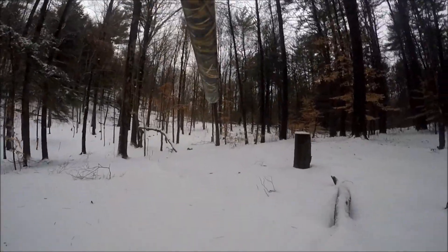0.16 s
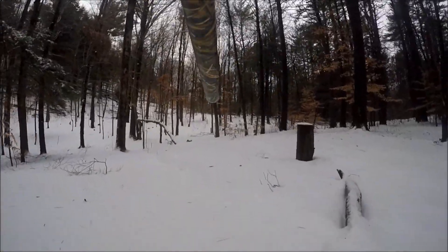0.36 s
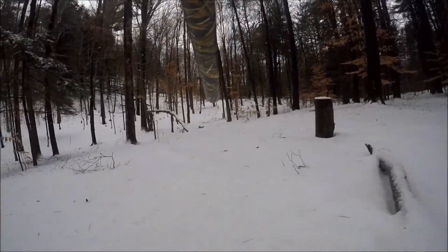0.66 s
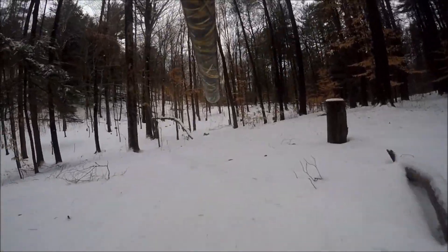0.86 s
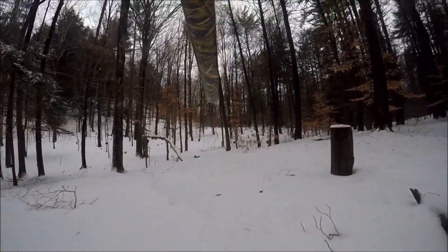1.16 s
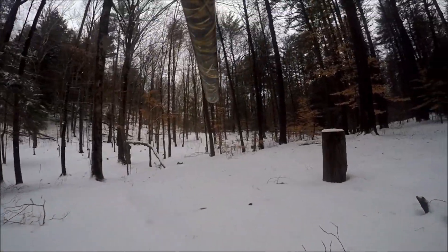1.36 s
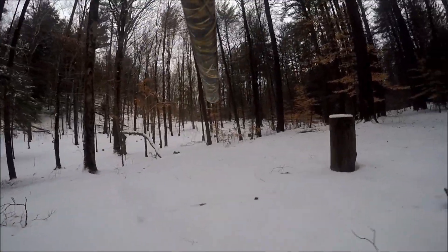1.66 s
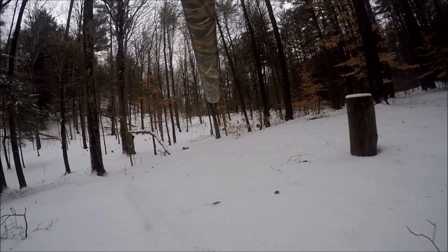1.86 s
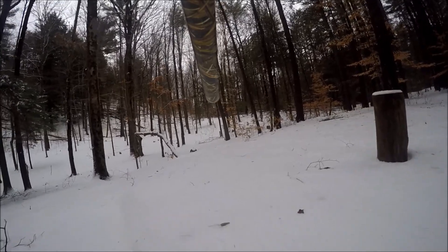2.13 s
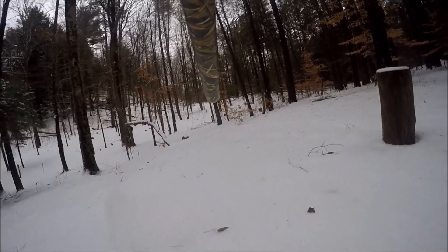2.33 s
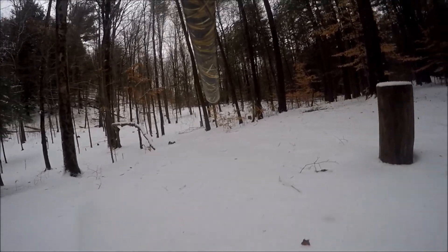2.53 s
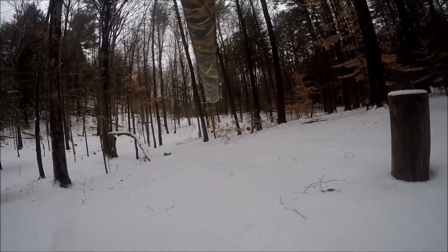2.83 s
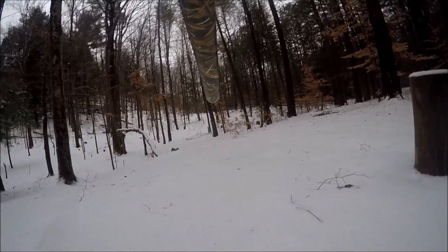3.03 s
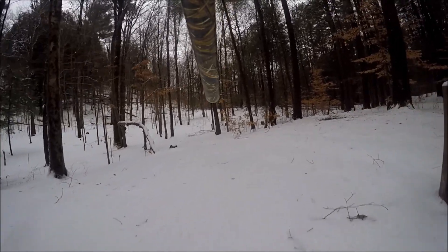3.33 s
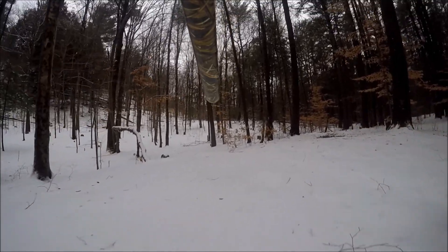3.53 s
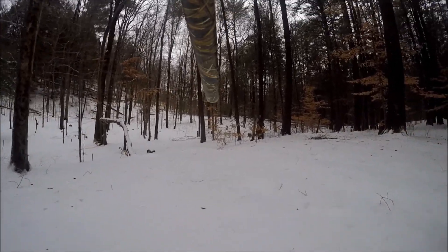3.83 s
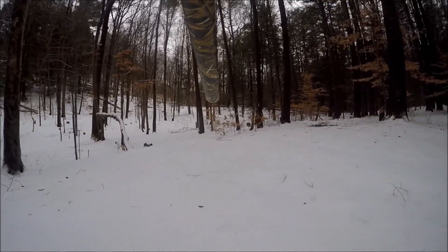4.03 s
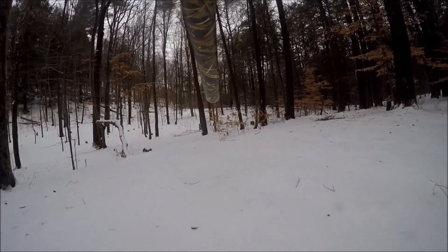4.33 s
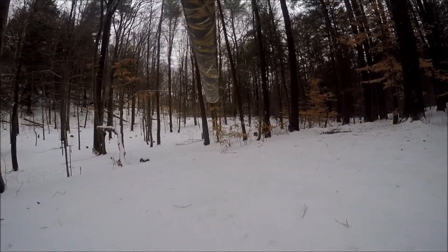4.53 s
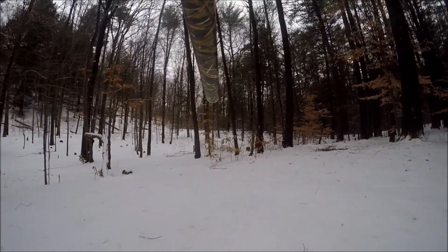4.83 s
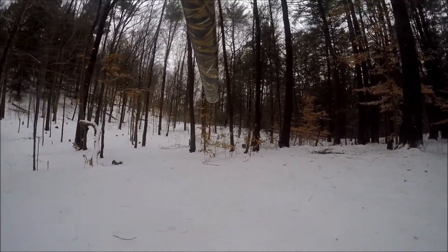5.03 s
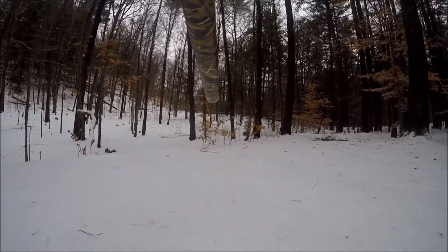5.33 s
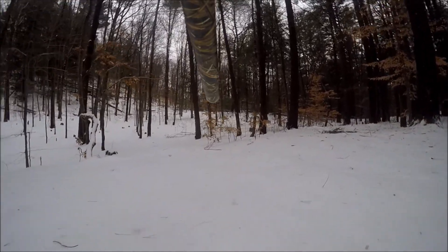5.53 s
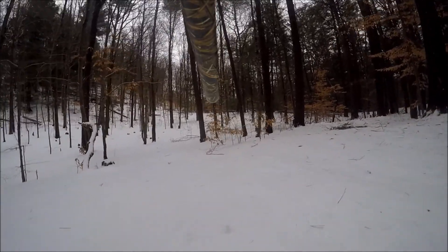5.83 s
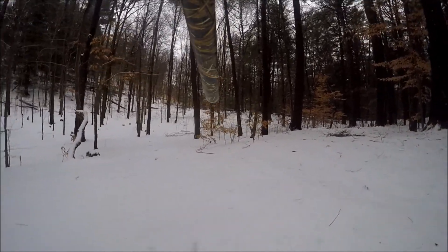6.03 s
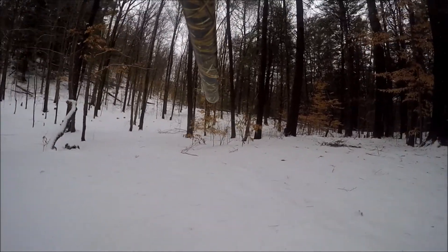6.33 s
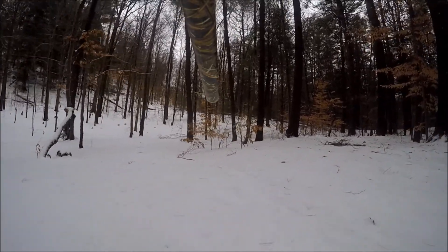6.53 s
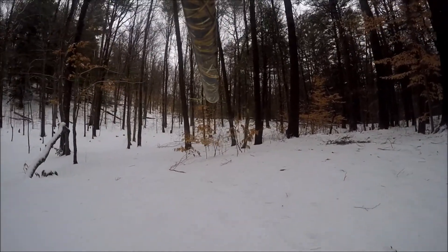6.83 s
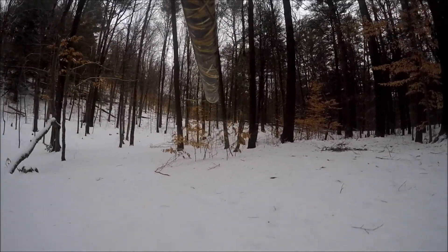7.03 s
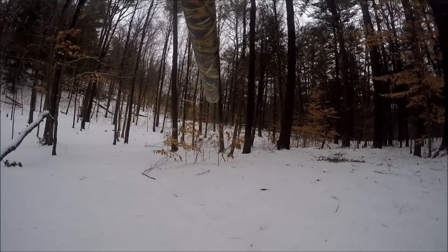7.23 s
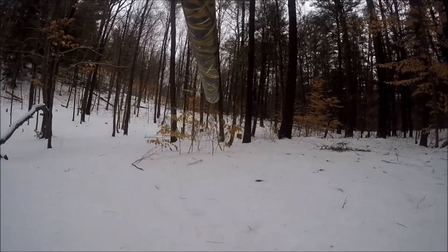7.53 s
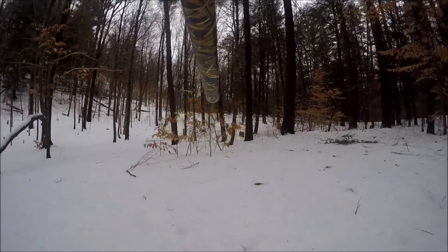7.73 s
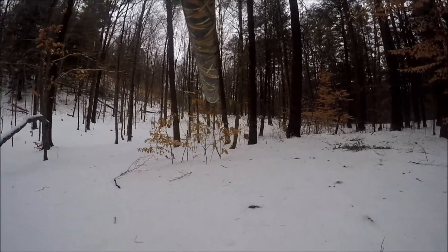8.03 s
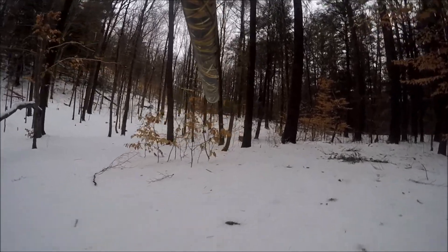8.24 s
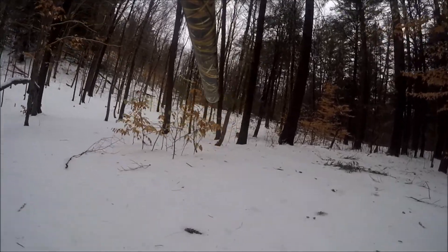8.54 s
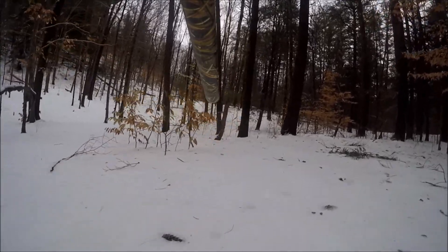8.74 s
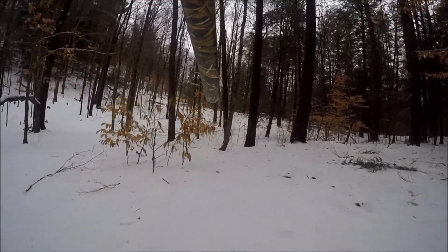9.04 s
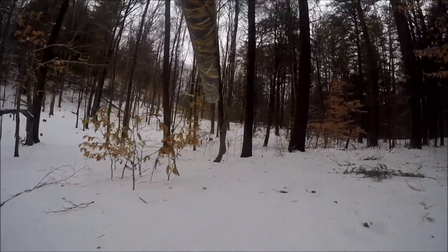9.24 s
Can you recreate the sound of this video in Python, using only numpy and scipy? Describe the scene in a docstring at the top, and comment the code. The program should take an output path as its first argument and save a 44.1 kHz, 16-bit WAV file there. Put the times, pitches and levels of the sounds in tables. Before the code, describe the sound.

Someone walks over crisp, squeaky snow, each step a grainy crunch, while carried gear thuds and hums low close to the microphone.

```python
"""Boots crunch through crusty snow in still winter woods, heard by a small camera in a housing on carried gear.
Breaking crust is a hail of short noisy grains, one band for each grain size, coloured by the housing;
slabs of crust snap as sudden noise spurts. Knocks tap the shell and set the mount ringing on two close
low modes that beat; walking hums in the mount, rumbles in the microphone and rattles loose gear.
Faint filtered noise makes the still air and the microphone's own hiss."""
import sys
import numpy as np
from scipy import signal
from scipy.fft import rfft, irfft
from scipy.io import wavfile

SR = 44100
rng = np.random.default_rng(int(sys.argv[2]) if len(sys.argv) > 2 else 0)


def to_linear_factor(level_db):
    """Convert decibel levels (scalar or array-like) to linear amplitude factors."""
    exponent = np.asarray(level_db, float) / 20
    return 10 ** exponent


def unload_audio(sound):
    """Save the sound as a 16-bit wav file, at the path given as the first command line argument."""
    columns = np.transpose(np.atleast_2d(sound))
    # keep every value between -1 and 1, then stretch to whole-number steps
    steps = np.round(np.clip(columns, -1, 1) * 32767)
    wavfile.write(sys.argv[1], SR, steps.astype(np.int16))


N = 413658  # samples

# grain sizes from lumps to crystals: breaks_per_s, fade_t60_s, steady_share (against grains of rms 1)
GRAIN_SIZES = [(292.5, 0.027, 0.28), (301, 0.016, 2.75), (526, 0.007, 1.44), (498, 0.0049, 0.99),
               (700, 0.0078, 2.5), (1390, 0.0022, 0.08), (1750, 0.0042, 0.32)]
# borders between the bands that the grain sizes fill: edge_hz
GRAIN_EDGES = [950, 2000, 2600, 3200, 5000, 8000]
# spectrum of breaking snow: frequency_hz, density_db
SNOW_SPECTRUM = [(100, 1.5), (200, -2), (500, -6.5), (1000, -0.5), (2000, -1), (4000, -4.5), (7000, -2),
                 (10000, -17.5), (15000, -21.5)]
# a spectrum that changes nothing: frequency_hz, gain_db
FLAT_SPECTRUM = [(1000, 0)]
# peaks and dips of the housing in front of the microphone: centre_hz, width_hz, gain_db
HOUSING_PEAKS = [(1305, 130, 6), (1620, 77, -10.5), (1830, 190, 4), (2630, 516, 16), (3844, 236, -9.5),
                 (4560, 1930, 4), (10460, 1200, 5.5), (11500, 670, -5.5), (13500, 730, 5),
                 (14000, 300, -14)]
# peaks and dips on each boot's own side of the housing, one list a boot: centre_hz, width_hz, gain_db
BOOT_PEAKS = [
    [(4630, 1700, 3), (6060, 390, -5), (6600, 260, 2.5), (7600, 780, -4), (8570, 550, 2)],
    [(3800, 390, 4), (7300, 530, 3), (8040, 1660, -7)],
]
FIRM_DB = -34  # reference level of firm pressure
LOW_DB, LOW_PER_DB = -9.5, 0.2525  # low crunch at the firm level and the start; its gain in dB per dB of easing
THINNING_DB_PER_S = -0.2328  # the lower crunch weakens as the snow gets shallower along the way


def crush():
    """Granular fracture: each grain size breaks at random in its own band; shared slips modulate them all."""
    power, fine_power = pressure()
    level_db = 10 * np.log10(power)
    thinning_db = THINNING_DB_PER_S * np.arange(N) / SR
    low_db = LOW_DB + thinning_db + LOW_PER_DB * (FIRM_DB - level_db)

    # under full weight the snow gives evenly; light scuffs come in fits
    fits = np.clip(0.5 + 0.013 * (FIRM_DB - level_db), 0.3, 2.5)
    slips = (1.21 + grains(rate=47, spread_db=2.0, t60=0.075)) ** fits / 2.08 ** fits

    rest = colour(rng.standard_normal(N), SNOW_SPECTRUM)
    bands = []
    for hz in GRAIN_EDGES:
        bands.append(band(rest, hz, "low", order=3))
        rest = band(rest, hz, "high", order=3)
    bands.append(rest)

    # the mix of sizes changes as the sole rolls over the snow
    parts = []
    for noise, (rate, t60, steady) in zip(bands, GRAIN_SIZES):
        mix = drift(rate=14.0, depth_db=2.0)
        breaking = unit(steady + grains(rate, 2.26, t60))
        parts.append(noise * slips * mix * breaking)

    # firm pressure brings out the squeaky middle sizes
    squeak = to_linear_factor(np.clip(0.56 * (level_db - FIRM_DB), -4, 5))
    parts[2:4] = [part * squeak for part in parts[2:4]]
    parts[1] = parts[1] * to_linear_factor(thinning_db)

    side = boot(np.arange(N) / SR)

    def through_housing(group):
        """Resonant transmission: the path through the housing changes with the boot that is down."""
        sides = [colour(sum(group), FLAT_SPECTRUM, HOUSING_PEAKS + peaks) for peaks in BOOT_PEAKS]
        return unit(np.choose(side, sides))

    low = through_housing(parts[:1])
    middle = through_housing(parts[1:5])
    fine = through_housing(parts[5:])
    return to_linear_factor(level_db) * (to_linear_factor(low_db) * low + middle) + np.sqrt(fine_power) * fine


# pushes of heel, sole or toe into the snow: start_s, length_s, level_db, change_by_end_db,
# fine_hiss_db (relative to the push)
PUSHES = [(0.0, 0.087, -31, -15, -10.5), (0.09, 0.096, -34, 4.5, -9), (0.189, 0.047, -32, -8.5, -11),
          (0.25, 0.04, -44, 6, -6), (0.664, 0.058, -38, 9, -8.5), (0.73, 0.11, -25.5, -5.5, -11),
          (0.855, 0.022, -24, -14.5, -4.5), (1.22, 0.064, -42, 1.5, -10.5), (1.29, 0.1, -31.5, -4, -9),
          (1.381, 0.058, -39, -4.5, -11), (1.756, 0.067, -35.5, 4, -15), (1.831, 0.11, -30, -2.5, -9),
          (1.912, 0.11, -40, -2, -2.5), (2.239, 0.085, -34.5, 3, -12), (2.333, 0.12, -35.5, 0.5, -9),
          (2.501, 0.032, -38.5, 0, -2.5), (2.899, 0.055, -32.5, 0.5, -7), (2.962, 0.15, -27.5, -4, -8.5),
          (3.113, 0.029, -51, 6.5, -7), (3.18, 0.021, -35.5, -7, -18), (3.424, 0.092, -50, 8.5, -6),
          (3.533, 0.07, -44, 8.5, -4.5), (3.594, 0.11, -29.5, -6, -10), (3.714, 0.042, -50, 8, -9.5),
          (4.097, 0.088, -33, -2, -10), (4.186, 0.19, -30, -9.5, -11), (4.737, 0.058, -38, 11.5, -16),
          (4.783, 0.12, -30, -5.5, -10), (5.318, 0.053, -34.5, 6, -12.5), (5.38, 0.11, -26.5, -6.5, -10.5),
          (5.492, 0.078, -31.5, -5, -10), (5.81, 0.18, -42, -6, -7.5), (5.909, 0.034, -29.5, -3.5, -15),
          (5.936, 0.138, -25, -11, -13), (6.365, 0.13, -27.5, -10.5, -13.5),
          (6.478, 0.15, -26.5, -9.5, -14.5), (6.629, 0.014, -30, -3.5, -8), (6.992, 0.13, -34.5, 1.5, -9),
          (7.126, 0.05, -45.5, 1, -12), (7.464, 0.19, -32.5, -2, -12.5), (7.603, 0.1, -28.5, -19.5, -13),
          (7.691, 0.037, -35.5, -7.5, -10), (7.735, 0.042, -41.5, -3.5, -6.5),
          (8.082, 0.16, -33.5, -1.5, -10), (8.262, 0.014, -39, 3, -1.5), (8.624, 0.061, -31.5, 1, -10),
          (8.685, 0.15, -29.5, -6, -8.5), (9.112, 0.024, -37.5, -2, -9), (9.151, 0.048, -40.5, 5, -9),
          (9.221, 0.036, -45.5, 3, -11), (9.251, 0.13, -30.5, -2, -9.5)]
# crumbs of crust and small scuffs between the pushes: centre_s, peak_db, fine_hiss_db (relative to the crumb)
CRUST_CRUMBS = [(0.365, -45.5, -9), (0.628, -44, -3.5), (0.897, -32.5, -11), (0.92, -45, -18),
                (0.965, -44, -19), (1.121, -40, -15), (1.175, -42.5, -6), (1.2, -42.5, -4),
                (1.466, -38, -8), (1.538, -40, -5.5), (1.704, -46, -21), (2.052, -41, -4.5),
                (2.576, -44.5, -8), (4.44, -45, -2.5), (4.672, -41, -9), (4.716, -43.5, -8.5),
                (5.149, -48, -15), (5.284, -52, -16), (5.792, -36.5, -7), (6.109, -36, -2.5),
                (6.675, -42.5, -10), (6.713, -46, -10), (6.956, -41, -3.5), (7.206, -42, -3),
                (7.819, -39, -9.5), (7.96, -50, -13), (7.998, -44, -10), (8.049, -48, -10),
                (8.353, -48, -6), (8.848, -39.5, -3.5), (8.869, -39.5, -11), (8.885, -39, -8)]
BITE_S, RELEASE_S, CRUMB_S = 0.01, 0.041, 0.0099  # rise of a push, t60 after it, half length of a crumb
SETTLE_DB, SETTLE_S = -17.5, 0.63  # loose snow trickles after each push: level relative to it, t60
RUSTLE_DB, RUSTLE_FINE_DB = -62.5, -8.5  # legs and clothing: level, and fine hiss relative to it


def pressure():
    """Addition of powers: pushes bite fast, hold on a slope and let go; crumbs are brief raised bumps."""
    t = np.arange(N) / SR
    power = (to_linear_factor(RUSTLE_DB) * drift(rate=61.0, depth_db=2.0)) ** 2
    fine = power * to_linear_factor(2 * RUSTLE_FINE_DB)  # twice the dB, because these are powers
    pushes = np.zeros(N)
    for s, length, db, change_db, fine_db in PUSHES:
        near = slice(int(s * SR), int((s + length + RELEASE_S) * SR))
        age = t[near] - s
        slope_db = change_db * np.minimum(age / length, 1)
        release_db = -60 * np.maximum(age - length, 0) / RELEASE_S
        push = to_linear_factor(2 * (db + slope_db + release_db)) * np.minimum(age / BITE_S, 1) ** 2
        pushes[near] += push
        fine[near] += push * to_linear_factor(2 * fine_db)
    for s, db, fine_db in CRUST_CRUMBS:
        near = slice(int((s - CRUMB_S) * SR), int((s + CRUMB_S) * SR))
        bump = to_linear_factor(2 * db) * np.cos(np.pi / 2 * (t[near] - s) / CRUMB_S) ** 2
        power[near] += bump
        fine[near] += bump * to_linear_factor(2 * fine_db)
    # a thousandfold fall of power is only 30 dB, so fading over half of SETTLE_S lets the power fall by 60 dB
    # in SETTLE_S
    tail = fade(pushes, SETTLE_S / 2) * np.log(1000) / (SETTLE_S / 2 * SR)
    trickle = to_linear_factor(2 * SETTLE_DB) * tail
    return power + pushes + trickle, fine + trickle * to_linear_factor(2 * RUSTLE_FINE_DB)


FIRST_SWAP_S, STEP_S = 0.5, 0.567  # the boots take turns


def boot(s):
    """Periodic alternation of gait: which boot is down at time s, 0 or 1."""
    return (np.floor((s - FIRST_SWAP_S) / STEP_S).astype(int) + 1) % 2


# slabs of crust snapping: start_s, bright_peak_db, fade_t60_s
SLAB_SNAPS = [(0.516, -33.5, 0.053), (0.673, -19.5, 0.016), (0.742, -13.5, 0.04), (0.757, -25, 0.03),
              (0.785, -22, 0.022), (0.834, -25, .015), (0.854, -21, 0.012), (0.858, -16, 0.037),
              (1.1326, -19.5, 0.027), (1.316, -28, 0.035), (1.767, -24.5, 0.014), (1.8392, -22, 0.018),
              (1.874, -20, 0.023), (1.897, -24, 0.025), (2.272, -19.5, 0.027), (2.293, -21, 0.022),
              (2.415, -24, 0.033), (2.653, -33.5, 0.014), (2.9029, -14.5, 0.015), (2.93, -21.5, 0.028),
              (2.971, -23, 0.058), (2.983, -19, .02), (3.002, -26, 0.025), (3.041, -18.5, 0.027),
              (4.132, -19, 0.033), (4.172, -23.5, 0.022), (4.199, -15.5, 0.064), (4.218, -15, 0.027),
              (4.31, -26, 0.024), (4.3827, -26, 0.015), (4.78, -20, 0.027), (4.804, -18, 0.032),
              (4.9722, -28.5, 0.057), (5.05, -22.5, 0.017), (5.363, -22, .02), (5.376, -22, 0.025),
              (5.39, -18.5, 0.04), (5.438, -23, .015), (5.456, -26, .02), (5.505, -23, 0.019),
              (5.825, -22, 0.047), (5.916, -23.5, 0.064), (5.941, -15, 0.025), (5.971, -21, .02),
              (6.3692, -18, 0.02), (6.4808, -20, 0.051), (6.493, -16.5, 0.015), (6.515, -22, .02),
              (6.559, -16.5, 0.024), (6.638, -21, 0.027), (6.915, -28.5, 0.05), (6.999, -22, 0.022),
              (7.468, -21.5, 0.14), (7.588, -21, 0.022), (7.62, -20, 0.032), (7.7257, -21.5, 0.024),
              (8.114, -20.5, 0.28), (8.156, -19, 0.027), (8.636, -23, 0.078), (8.694, -18, 0.08),
              (8.727, -21, 0.047), (8.817, -23, .03), (9.268, -25, 0.016), (9.276, -19, 0.035),
              (9.291, -20.5, 0.042), (9.322, -20, 0.02)]
DULL_DB = -11  # peak of the lower part of a snap, relative to the bright part


def snaps(size=4096):
    """Brittle fracture: each slab cracks with a sudden spurt of noise, bright over a duller body."""
    out, t = np.zeros(N + size), np.arange(size) / SR
    for s, db, t60 in SLAB_SNAPS:
        decay = np.exp(-np.log(1000) * t / t60)
        rise = np.minimum(t / 0.00076, 1)
        spurt = rng.standard_normal(size) * decay * rise
        spurt = colour(spurt, SNOW_SPECTRUM, HOUSING_PEAKS + BOOT_PEAKS[boot(s)])
        spurt = band(spurt, 5100.0, "low")
        dull = band(spurt, 2430.0, "low")
        bright = spurt - dull
        snap = bright / np.abs(bright).max() + to_linear_factor(DULL_DB) * dull / np.abs(dull).max()
        i = int(s * SR)
        out[i:i + size] += to_linear_factor(db) * snap
    return out[:N]


# knocks on the mount: start_s, ring_db, tap_peak_db, bounce_fade_s (time constant), favoured_pitch_hz
MOUNT_KNOCKS = [(0, -12.5, -31.5, 0.0029, 1020), (0.308, -48, -36, 0.017, 447),
                (0.441, -21, -30, 0.019, 720), (0.61, -28, -28.5, 0.011, 454),
                (1.135, -19, -20, 0.0066, 1240), (1.415, -40, -63, .004, 1000),
                (1.638, -66, -48, .005, 800), (1.66, -62, -50, 0.003, 800), (1.681, -55, -38.5, 0.006, 700),
                (1.9, -31.5, -70, .004, 1000), (2.214, -36, -43, .005, 795),
                (2.271, -17.5, -24, 0.018, 533), (2.606, -37, -38.5, 0.0089, 905),
                (2.651, -25, -33.5, 0.047, 796), (2.705, -21, -25.5, 0.0087, 487),
                (3.008, -31, -60, .004, 1000), (3.14, -37, -43, .004, 800), (3.186, -76, -42, 0.0091, 700),
                (3.449, -21, -38, 0.0054, 610), (4.01, -46, -38, 0.005, 895),
                (4.967, -42, -29, 0.0074, 1400), (5.049, -16, -27.5, 0.0076, 970),
                (5.325, -48, -23, 0.017, 1330), (6.914, -75, -30, 0.0059, 1300),
                (6.953, -71, -34.5, 0.0067, 900), (7.725, -17, -20.5, 0.0082, 1310),
                (7.86, -60, -46, .008, 800), (8.274, -41, -36, 0.0076, 1230)]
# modes of the housing shell before each knock varies them: pitch_hz, level_db (relative), t60_s
SHELL_MODES = [(337, 1, 0.02), (470, 2, 0.028), (642, -1, 0.025), (846, -1, 0.04), (1310, 6, 0.03),
               (1970, -2, .03), (2540, -2, 0.014)]
SPOT_DB = 1.5  # spread of a mode's level from knock to knock
OFF_SPOT_DB = 6.5  # loss per octave away from the favoured pitch


def taps(size=8192):
    """Modal excitation: the spot struck sets the mix of shell modes; one blow and a scatter of quick bounces."""
    out = np.zeros(N + SR + size)
    age = np.arange(size) / SR
    for s, _, tap_db, bounce_s, spot_hz in MOUNT_KNOCKS:
        modes = []
        for hz, db, t60 in SHELL_MODES:
            detune, lift = rng.standard_normal(2)
            loss_db = OFF_SPOT_DB * abs(np.log2(hz / spot_hz))
            modes.append((hz * (1 + 0.022 * detune), db + SPOT_DB * lift - loss_db, t60))
        chance = rng.standard_normal(size)
        rare = np.abs(chance) > 2.5
        blows = 0.16 * chance * np.exp(-age / bounce_s) * rare
        blows[0] = 1
        softened = ring(modes)[:size] * np.minimum(age / 0.0013, 1)
        tap = signal.fftconvolve(softened, blows)
        i = int(s * SR)
        out[i:i + len(tap)] += to_linear_factor(tap_db) * tap / np.abs(tap).max()
    return out[:N]


# low modes of the mount: pitch_hz, level_db (relative), t60_s
# the close pair start in opposite senses, so the ring swells, then beats
MOUNT_MODES = [(97.54, 10.5, 0.47), (107.45, 9, 0.64), (203.5, -12.5, 0.51)]
# how hard walking shakes the gear: time_s, hum_db, rumble_db, shell_rattle_db
WALKING_SWAY = [(0.0, -46.5, -43, -61), (1.2, -38.5, -44.5, -58.5), (2.7, -49, -46, -71),
                (3.6, -43.5, -47, -67.5), (5.5, -43.5, -44, -66), (7.0, -48.5, -48, -84),
                (9.38, -46.5, -44.5, -64.5)]
RING_LAG_S = 0.0041  # the mount answers a moment after the shell
WAVER_DB = 1.5  # the grip on the gear shifts, so the ring wavers


def mount():
    """Beating of coupled modes: knocks ring the mount, and random shaking keeps its low modes humming."""
    response = ring(MOUNT_MODES)
    blows = np.zeros(N)
    for s, ring_db, *_ in MOUNT_KNOCKS:
        blows[int((s + RING_LAG_S) * SR)] = to_linear_factor(ring_db)
    shake_db, rumble_db, _ = curve(WALKING_SWAY)
    shaken = signal.fftconvolve(rng.standard_normal(N), response)[:N]
    hum = to_linear_factor(shake_db) * unit(band(shaken, 106.0, "low"))
    deep = band(rng.standard_normal(N), [14.0, 34.0], "band", order=1)
    deep = unit(band(deep, 43.0, "low"))
    rumble = to_linear_factor(rumble_db) * drift(rate=6.3, depth_db=3.5) * deep
    rings = drift(rate=16.0, depth_db=WAVER_DB) * signal.fftconvolve(blows, response)[:N]
    return rings + hum + rumble


def rattle():
    """Random impact excitation: straps and gear tick against the shell in loose fits as the walker sways."""
    fits = grains(rate=60, spread_db=1.5, t60=0.0061) * drift(rate=8.0, depth_db=4.0)
    ticks = rng.standard_normal(N) * fits
    shell = signal.fftconvolve(ticks, ring(SHELL_MODES))[:N]
    _, _, rattle_db = curve(WALKING_SWAY)
    return to_linear_factor(rattle_db) * unit(band(shell, 1200.0, "low"))


# spectrum of the still woods: frequency_hz, density_db
WOODS_SPECTRUM = [(100, 6), (250, -20), (600, -8.5), (1500, 0.5), (3000, -11.5), (6000, -9.5), (10000, -13),
                  (15000, -16.5)]
WOODS_DB = -64.5  # rms level of the air


def woods():
    """Stationary noise: still air heard through the housing, and the microphone's own hiss, which is not."""
    air = unit(colour(rng.standard_normal(N), WOODS_SPECTRUM, HOUSING_PEAKS))
    hiss = unit(colour(rng.standard_normal(N), WOODS_SPECTRUM))
    return to_linear_factor(WOODS_DB) * (air + to_linear_factor(-1.5) * hiss)


def grains(rate, spread_db, t60):
    """Poisson process: random breaks, a few larger than the rest, each rising within a moment; rms 1."""
    size_db = spread_db * np.minimum(rng.exponential(size=N), 3.0)
    breaks = (rng.random(N) < rate / SR) * to_linear_factor(size_db)
    return unit(fade(fade(breaks, t60), t60 / 4))


def ring(modes):
    """Modal superposition: response to one blow, neighbouring modes in opposite senses; peak 1."""
    t = np.arange(SR) / SR
    y = np.zeros(SR)
    for k, (hz, db, t60) in enumerate(modes):
        decay = np.exp(-np.log(1000) * t / t60)
        y += (-1) ** k * to_linear_factor(db) * decay * np.sin(2 * np.pi * hz * t)
    return y / np.abs(y).max()


def fade(x, t60):
    """Exponential decay: every impulse leaves a tail that falls by 60 dB in t60 seconds."""
    return signal.lfilter([1], [1, -np.exp(-np.log(1000) / (t60 * SR))], x)


def drift(rate, depth_db):
    """Slow random modulation: gain in straight dB lines between aims 1 / rate s apart, held after the 500th."""
    aims = rng.standard_normal(500)
    return to_linear_factor(depth_db * np.interp(np.arange(N) / SR * rate, np.arange(len(aims)), aims))


def colour(x, points, bumps=(), size=4096):
    """Minimum-phase filtering: a causal filter from a smooth spectrum plus resonant peaks and dips."""
    hz = np.maximum(np.arange(size // 2 + 1) * SR / size, 1)
    db = np.interp(np.log(hz), np.log([p[0] for p in points]), [p[1] for p in points])
    for centre, width, lift_db in bumps:
        db = db + lift_db / (1 + (2 * (hz - centre) / width) ** 2)
    # folding the cepstrum onto positive times makes the filter causal
    cepstrum = irfft(np.log(to_linear_factor(db)))
    cepstrum[1:size // 2] *= 2
    cepstrum[size // 2 + 1:] = 0
    return signal.fftconvolve(x, irfft(np.exp(rfft(cepstrum))))[:len(x)]


def band(x, hz, kind, order=2):
    """Band limiting: Butterworth filter, maximally flat in its pass band."""
    return signal.sosfilt(signal.butter(order, hz, kind, fs=SR, output="sos"), x)


def unit(x):
    """Normalisation of mean power: scale to rms 1."""
    return x / np.sqrt(np.mean(x ** 2))


def curve(table):
    """Linear interpolation: columns of a table joined by straight lines, one value a sample."""
    s, *columns = np.transpose(table)
    return [np.interp(np.arange(N) / SR, np.maximum.accumulate(s), c) for c in columns]


def scene():
    """Superposition: all sources add at the one microphone."""
    return (crush() + snaps() + taps() + mount() + rattle() + woods())[None]


def band_limit(x):
    """A steep low-pass at the top of the band."""
    return signal.sosfilt(signal.butter(12, 15810, fs=SR, output="sos"), x)


def record(dry):
    """Low-pass filtering: the camera cuts the top with a steep elliptic filter."""
    top_hz = 15280
    steep = signal.ellip(10, 0.5, 22, top_hz, fs=SR, output="sos")  # order, ripple dB, stop-band loss dB
    mix = signal.sosfilt(steep, dry)
    return band_limit(mix)


dry = scene()
out = record(dry)
unload_audio(out)
```